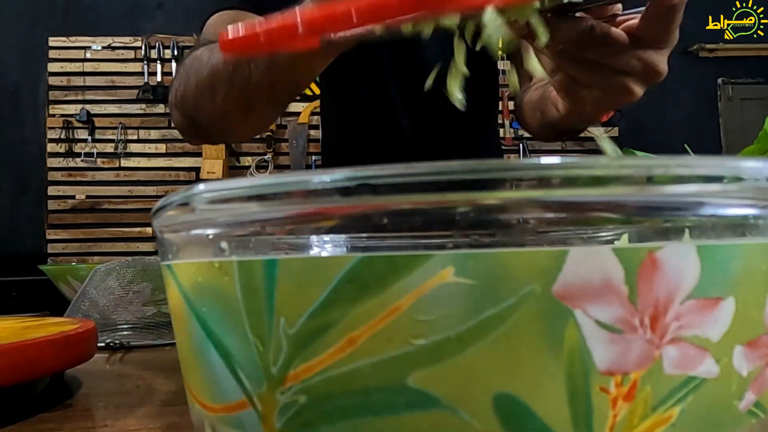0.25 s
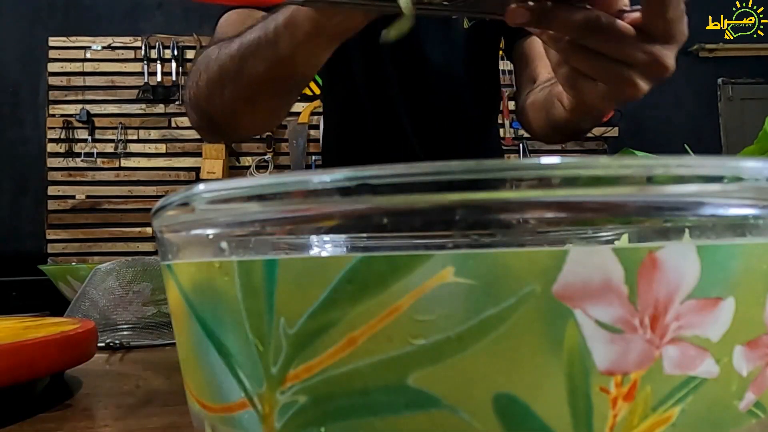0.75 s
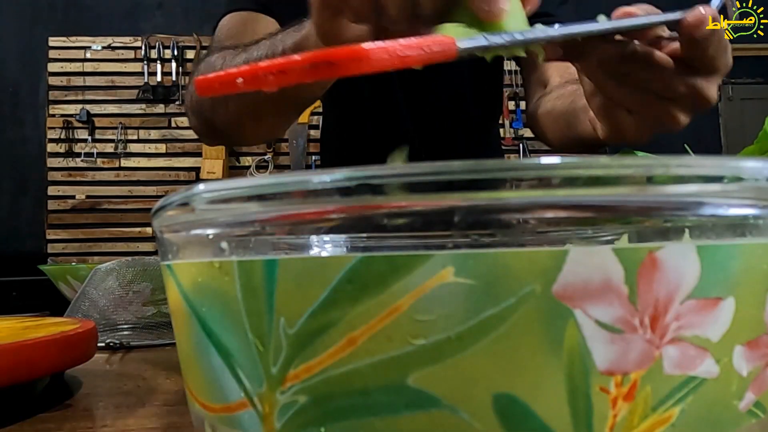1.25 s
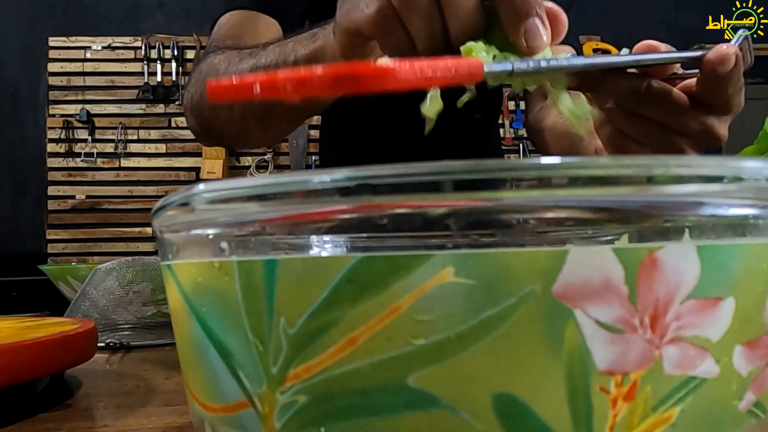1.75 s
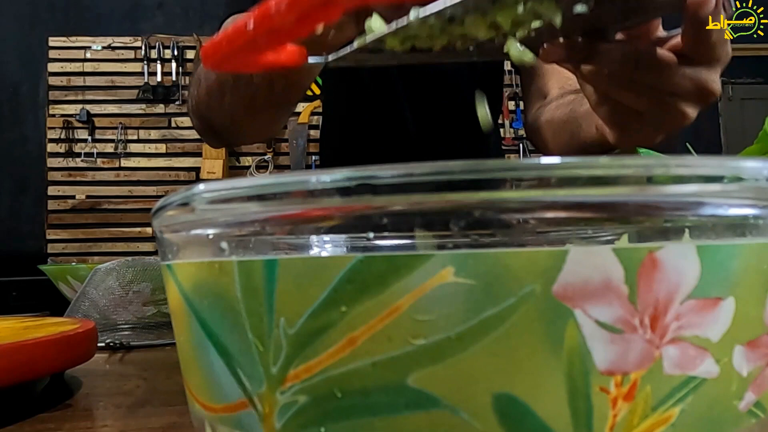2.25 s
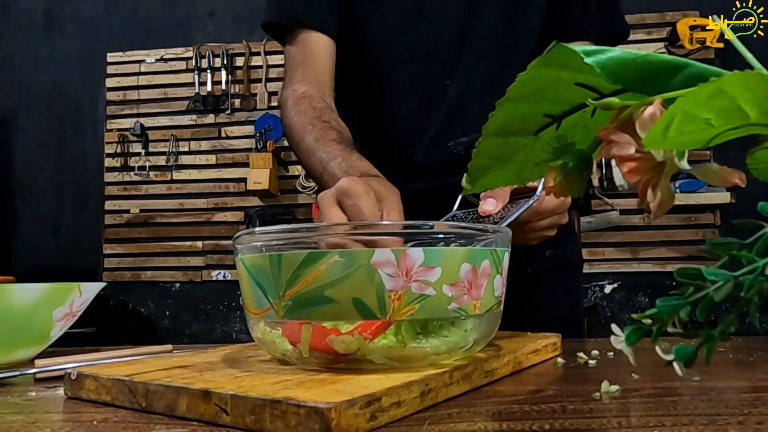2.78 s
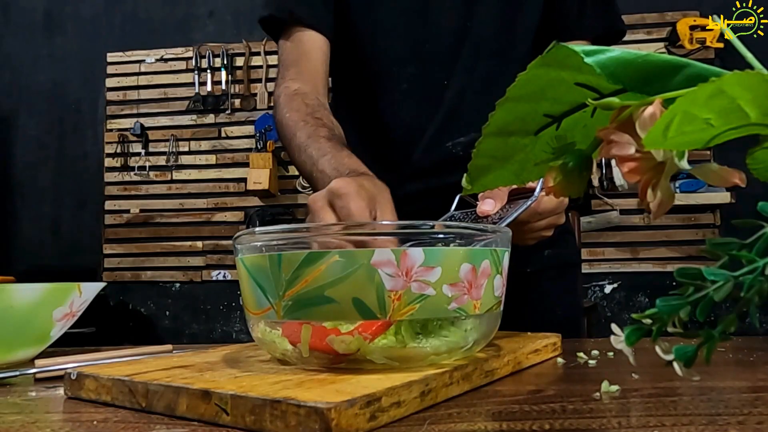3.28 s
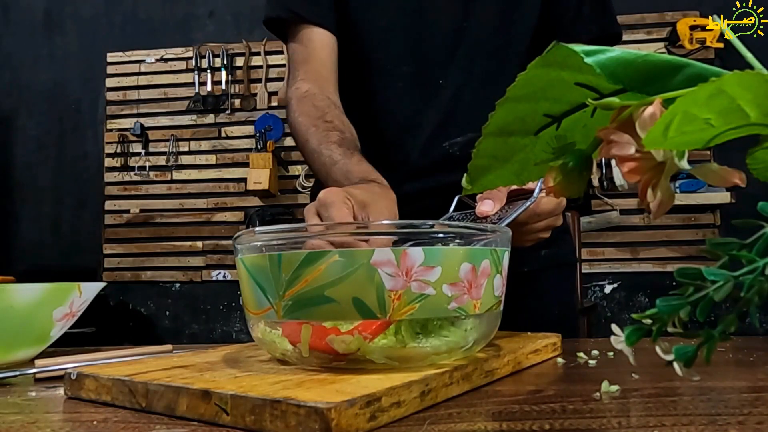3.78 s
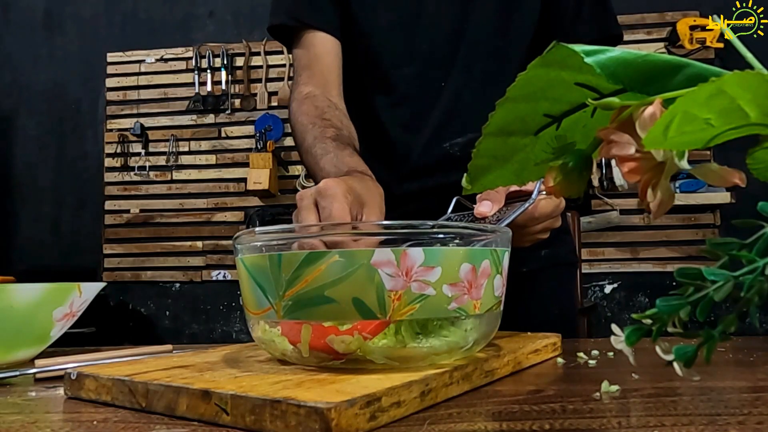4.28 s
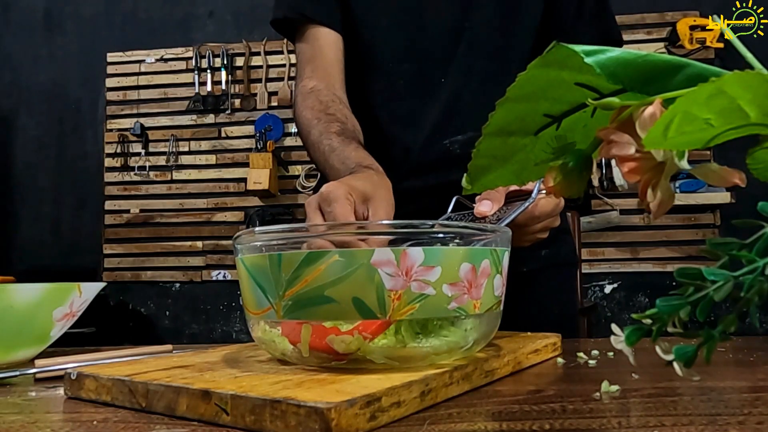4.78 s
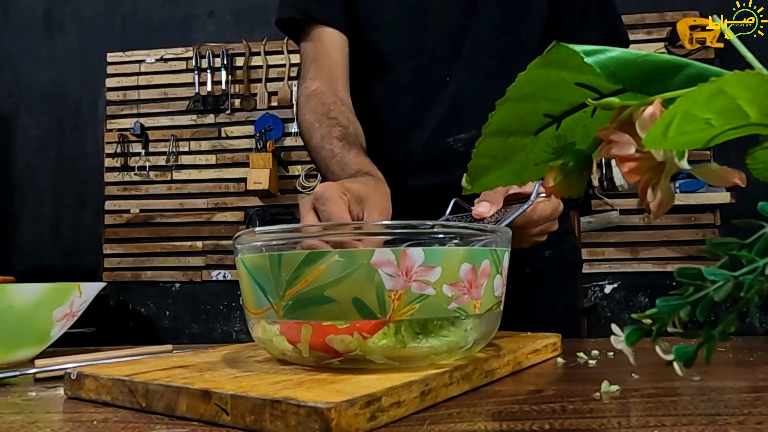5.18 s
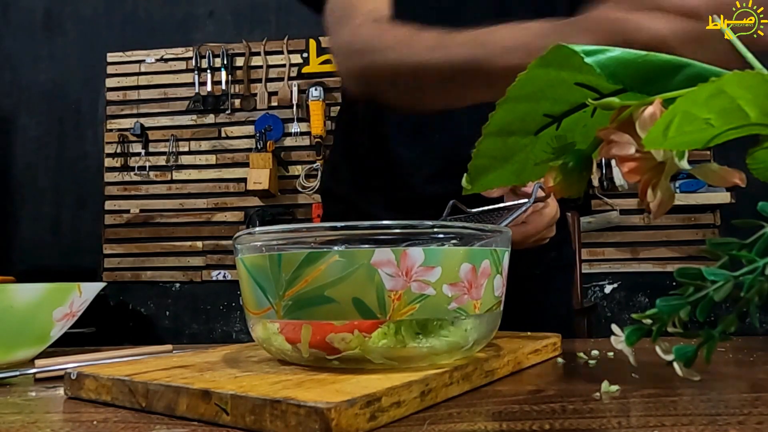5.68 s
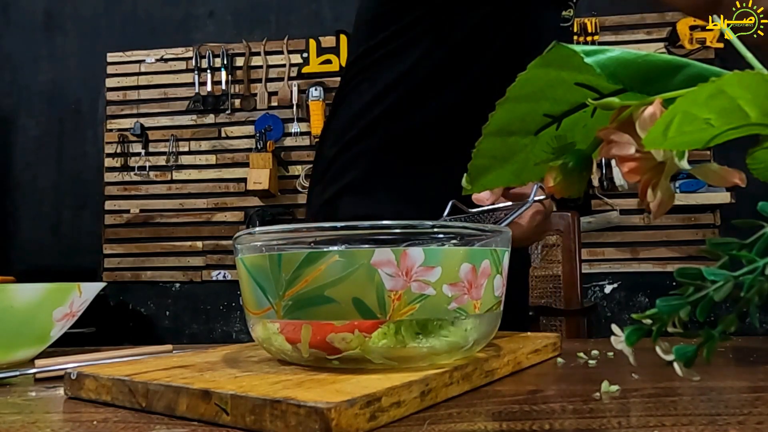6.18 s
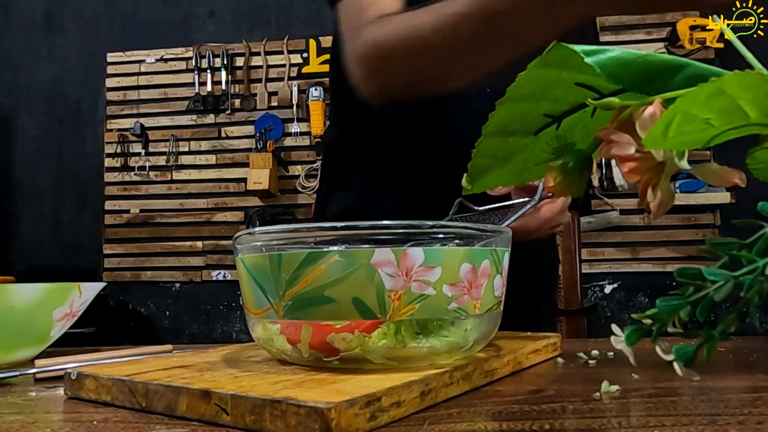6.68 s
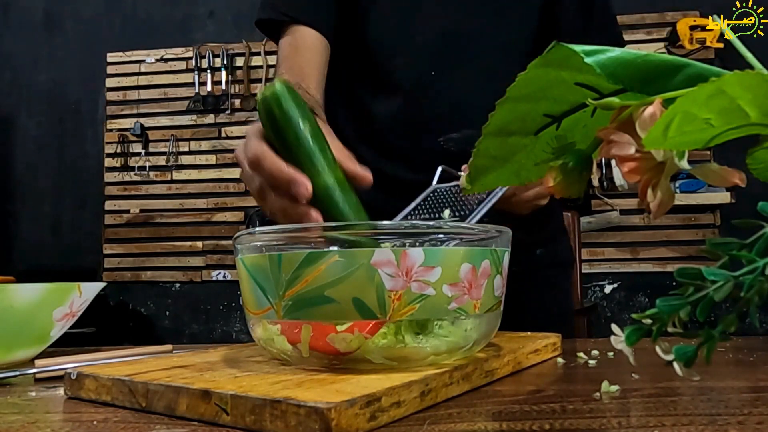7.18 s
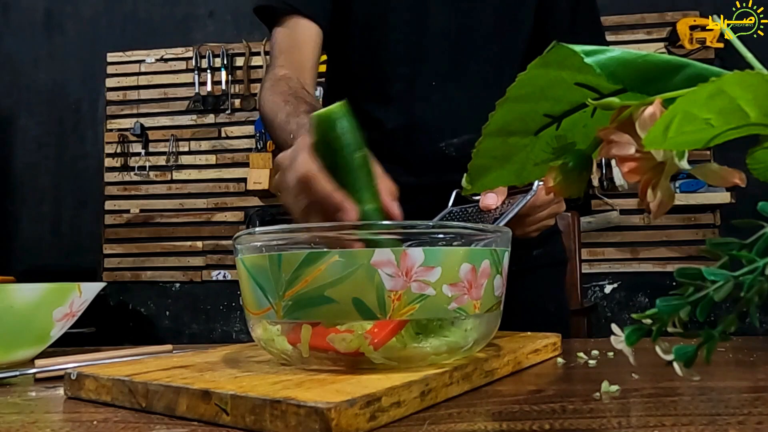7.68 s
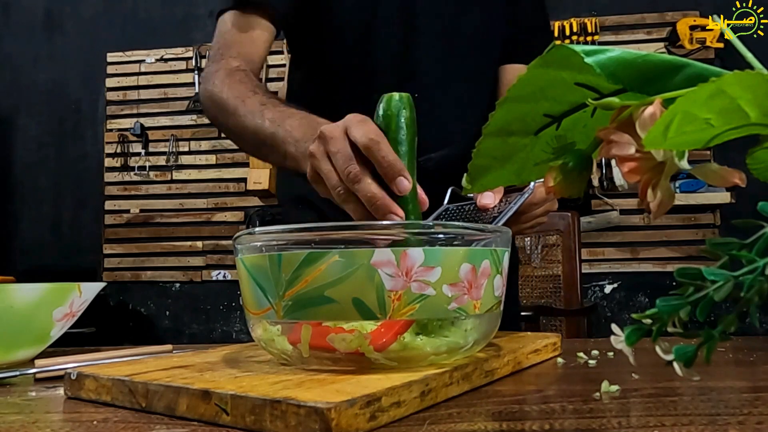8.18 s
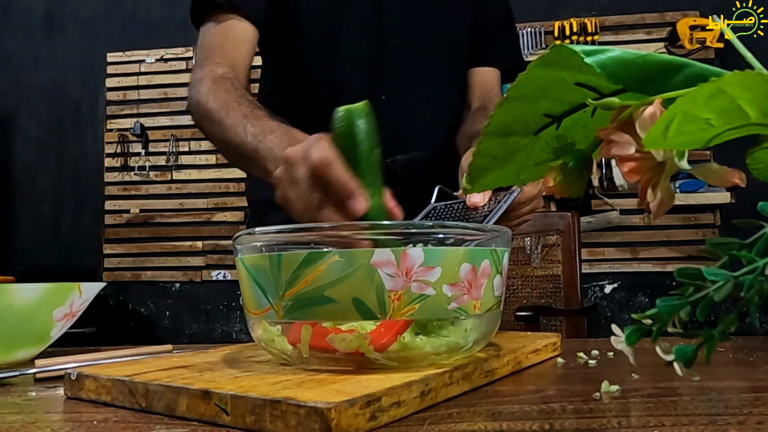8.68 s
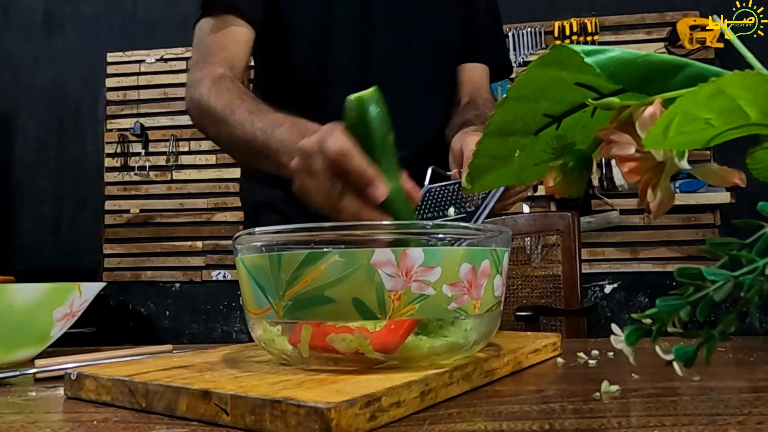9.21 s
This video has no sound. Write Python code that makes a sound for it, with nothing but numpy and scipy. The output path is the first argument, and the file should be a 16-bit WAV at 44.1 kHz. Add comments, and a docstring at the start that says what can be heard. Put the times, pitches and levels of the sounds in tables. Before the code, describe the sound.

Wet vegetable rasps in quick separate strokes on a steel grater over a glass bowl, softens, pauses with a wooden knock, then firm grating resumes.

```python
"""Hard crunches, then quick juicy strokes: cucumber is grated on steel over a glass bowl, in an echoing room.
The strokes soften as the piece wears down; something knocks on the wooden table as a whole cucumber is
fetched, the grater clinks on the bowl and firm strokes begin. Rasps are coloured random tears with damped
steel ringing, squelches are brief sines, clinks and knocks are decaying modes; filtered noise and low sines
make the table's rumble, and a faint swelling hiss, a low hum and still air lie behind."""
import sys
import numpy as np
from scipy import signal
from scipy.fft import rfft, irfft, next_fast_len
from scipy.io import wavfile
from scipy.ndimage import uniform_filter1d

SR = 44100
rng = np.random.default_rng(int(sys.argv[2]) if len(sys.argv) > 2 else 0)


def digitize_waveform(pressure):
    """Quantize a signal to 16-bit integers and store it at the path in sys.argv[1].

    Rows of a 2-D input are taken as channels; values are limited to [-1, 1].
    """
    field = np.atleast_2d(pressure).T
    bounded = np.clip(field, -1, 1)
    quanta = np.round(bounded * 32767).astype(np.int16)
    wavfile.write(sys.argv[1], SR, quanta)


N = 416744
TIME = np.arange(N) / SR

# Modes of the steel grater. Each row: frequency in Hz, relative level in dB, free ring (t60) in s.
GRATER_MODES = [(625, -9, 0.46), (1203, -6, 0.14), (1427, -9, 0.36), (1662, -2, 0.21), (2748, -8, 0.35),
                (3120, -10.5, 0.061), (4160, -5.5, 0.14), (4280, -18, 0.23), (4500, -18, 0.097),
                (5640, -16.5, .18), (8050, -13.5, 0.029)]


def from_db(db):
    """Decibels to gain."""
    return np.exp(np.asarray(db) * (np.log(10) / 20))


def rms_one(x):
    """Scale to unit power."""
    return x / np.sqrt(np.mean(x ** 2) + 1e-20)


def at_hz(points, hz):
    """Read a table on a log-frequency axis."""
    f, value = np.transpose(points)
    return np.interp(np.log(np.maximum(hz, 1)), np.log(f), value)


def in_time(rows):
    """Each column of a curve at every sample."""
    s, *columns = np.transpose(rows)
    return [np.interp(TIME, s, column) for column in columns]


def colour(x, spectrum):
    """Give a noisy signal a spectrum; rms 1."""
    size = next_fast_len(N + SR // 10, real=True)
    hz = np.fft.rfftfreq(size, 1 / SR)
    gain = from_db(at_hz(spectrum, hz)).astype(np.float32)
    coloured = irfft(rfft(x.astype(np.float32), size) * gain, size)
    return rms_one(coloured[..., :N])


def low_pass(x, hz, order=2):
    """Dull a signal above hz."""
    return signal.sosfilt(signal.butter(order, min(hz, SR / 2 - 1), fs=SR, output="sos"), x)


def low_pass_in_phase(x, hz):
    """Dull forwards and then backwards, so that the lows stay in step with the source."""
    return low_pass(low_pass(x, hz)[::-1], hz)[::-1]


def drift(rate):
    """Smooth chance with a spread of about 1, turning about rate times a second."""
    knots = np.cumsum(rng.exponential(1 / rate, N // 20))
    return np.interp(TIME, knots, rng.standard_normal(len(knots)))


def diffuse_noise(size):
    """Two channels of white noise from all around, whose likeness depends on frequency."""
    # Left-right likeness of diffuse sound. Each row: frequency in Hz, correlation from -1 to 1.
    likeness = [(25, 0.95), (60, 1), (130, 1), (400, 0.9), (1200, 0.62), (3000, 0.38), (7000, 0.9),
                (12000, .1)]
    mid, side = rfft(rng.standard_normal((2, size)))
    alike = np.clip(at_hz(likeness, np.fft.rfftfreq(size, 1 / SR)), -1, 1)
    common = np.sqrt((1 + alike) / 2) * mid
    opposed = np.sqrt((1 - alike) / 2) * side * [[1], [-1]]
    return irfft(common + opposed, size)


def ring(modes, extra_db=0, length=1):
    """Decaying sines of a struck body, neighbours opposite in sign; length scales every decay time."""
    hz, db, t60 = np.transpose(modes)[:, :, None].astype(np.float32)
    t = TIME[:SR // 2].astype(np.float32)
    signs = (-1) ** np.arange(len(hz))[:, None]
    decay = np.exp(-np.minimum(t * np.float32(np.log(1000) / length) / t60, 20))
    strengths = np.ravel(signs * from_db(db + extra_db))
    return strengths @ (decay * np.sin(np.float32(2 * np.pi) * hz * t))


def add(track, s, sound):
    """Mix a sound in at a time."""
    start = round(s * SR)
    track[start:start + len(sound)] += sound[:N - start]


def stroking(strokes, attack_s, bite_db, swell_db, release_s, drag_db, drag_s, drag_crunch_db):
    """A push slides in, bites, holds, lets go and drags on: tearing level, and extra crunch in the lows."""
    motion = np.zeros((2, N))
    for s, hold, level_db, crunch_db in strokes:
        near = slice(max(0, int(s * SR) - SR // 8), int(s * SR) + 3 * SR // 4)
        t = TIME[near] - s
        before, held, after = np.minimum(t, 0), np.clip(t / hold, 0, 1), np.maximum(t - hold, 0)
        grip = np.exp(before / attack_s - after / release_s)
        # the level steps by bite_db at the bite and moves by swell_db over the hold
        push = grip * from_db(level_db - bite_db * (t < 0) + swell_db * (held - .5))
        drag = from_db(level_db + drag_db) * (after > 0) * (1 - grip) * np.exp(-(after / drag_s) ** 2)
        crunch = push * (from_db(crunch_db) - 1) + drag * (from_db(drag_crunch_db) - 1)
        motion[:, near] += [push + drag, crunch]
    return motion


def snagging(snap_s=.005):
    """A tooth snags in the juicy flesh and snaps free: one brief surge of tearing and crunch."""
    # Each row: time of the peak in seconds, level before the mix in dB, extra crunch in the lows in dB.
    snags = [(.298, -39.5, -10), (.462, -60, 19.5), (1.222, -46, 7), (1.479, -37, 6.5), (1.715, -44, -0.5),
             (1.822, -47, 17.5), (1.941, -44, 5), (1.975, -40, -8), (2.078, -36, -3.5)]
    motion = np.zeros((2, N))
    for s, level_db, crunch_db in snags:
        near = np.abs(TIME - s) < 10 * snap_s
        surge = from_db(level_db) * np.exp(-.5 * ((TIME[near] - s) / snap_s) ** 2)
        motion[:, near] += [surge, surge * (from_db(crunch_db) - 1)]
    return motion


def shifting(x, patchy_db, full_hz=2000):
    """The contact keeps changing, so brief resonances come and go at random pitches, least in the lows."""
    hz, _, frames = signal.stft(x.astype(np.float32), SR, nperseg=256)
    patches = uniform_filter1d(rng.standard_normal(frames.shape), size=9, axis=1)
    patches = uniform_filter1d(patches, size=4, axis=0)
    depth_db = patchy_db * np.sqrt(np.minimum(hz / full_hz, 1))[:, None]
    _, shifted = signal.istft(frames * from_db(depth_db * rms_one(patches)))
    return rms_one(shifted[:N])


def rasp(motion, spectrum, tears_per_s, size_db, catch_db, patchy_db, steel_db, crunch_hz):
    """The teeth tear cell after cell; the flesh catches and slips, so tears come in stronger and weaker clumps."""
    speed, crunch = motion
    sizes = from_db(size_db * np.minimum(rng.exponential(1, N), 4)) * rng.choice([-1, 1], N)
    torn = rng.random(N) < tears_per_s / SR
    tears = sizes * torn * from_db(catch_db * drift(260))
    grain = shifting(colour(tears, spectrum), patchy_db)
    sound = speed * grain + crunch * low_pass_in_phase(grain, crunch_hz)
    # the tears also set the hand-damped steel ringing
    steel = ring(GRATER_MODES, length=0.59)
    ringing = signal.oaconvolve(speed * rms_one(tears), steel / np.linalg.norm(steel))[:N]
    return sound + from_db(steel_db) * ringing


def squelch(motion, cycles=22, spread_octaves=0.24):
    """Juice pockets pop under the strokes, each at its own pitch, falling 60 dB in a set count of cycles."""
    # Wet pockets in the pulp. Each row: typical pitch in Hz, level relative to the stroke in dB,
    # pops per second of stroke.
    pockets = [(536, -9, 110), (4000, -23, 300)]
    speed, out, t = motion[0], np.zeros(N), TIME[:SR // 20]
    for centre_hz, level_db, per_s in pockets:
        born = np.flatnonzero((rng.random(N) < per_s / SR) & (speed > speed.max() / 20))
        for i, (detune, size_db) in zip(born, rng.standard_normal((SR // 20, 2))):
            hz = centre_hz * 2 ** (spread_octaves * detune)
            decay = from_db(level_db + size_db - 60 * t * hz / cycles)
            add(out, TIME[i], speed[i] * decay * np.sin(2 * np.pi * hz * t))
    return out


def hard_crunches():
    """The first abrupt pushes over the teeth: their motion and their rasp."""
    # Each row: bite in seconds, hold in seconds, level before the mix in dB, extra crunch in the lows in dB.
    strokes = [(.026, 0.002, -31.5, 0), (.041, 0.0024, -33, 0), (.058, 0.012, -34, 0.49)]
    # Colour of the rasp. Each row: frequency in Hz, relative density in dB per Hz.
    spectrum = [(120, -60), (200, -11.5), (309, 3.5), (512, -9.5), (647, -5), (789, -13.5), (1070, 1.5),
                (1430, -14), (2210, -7), (2510, -20), (4090, -14.5), (12100, -29.5), (15000, -45)]
    motion = stroking(strokes, attack_s=0.012, bite_db=2.5, swell_db=4.5, release_s=0.0036,
                      drag_db=-15, drag_s=0.026, drag_crunch_db=-33.0)
    return motion, rasp(motion, spectrum, tears_per_s=5000, size_db=2.5, catch_db=1.0, patchy_db=4.0,
                        steel_db=-31, crunch_hz=1500)


def juicy_strokes():
    """Quick wet pushes, about four a second, with snags and popping juice."""
    # Each row: bite in seconds, hold in seconds, level before the mix in dB, extra crunch in the lows in dB.
    strokes = [(.088, 0.054, -43.5, 9.5), (.283, 0.026, -34.5, -0.5), (.577, 0.046, -37, 4),
               (.824, .055, -38.5, 4.5), (1.05, 0.051, -40.5, 4.5), (1.317, 0.045, -40, 3.5),
               (1.56, 0.032, -40.5, 9), (1.79, .042, -36, 2), (2.026, 0.046, -37.5, 2),
               (2.29, 0.0099, -42, 6.5)]
    # Colour of the rasp. Each row: frequency in Hz, relative density in dB per Hz.
    spectrum = [(140, 0), (230, -10), (377, -2), (482, -11), (673, -7.5), (925, -20), (1410, -11.5),
                (2390, -15), (4130, -4.5), (4840, -11), (6650, -9), (9450, -13.5), (11100, -25.5),
                (12100, -20.5), (15500, -42)]
    motion = snagging() + stroking(strokes, attack_s=.016, bite_db=6.5, swell_db=2.5, release_s=.015,
                                   drag_db=-22, drag_s=.17, drag_crunch_db=14.5)
    grating = rasp(motion, spectrum, tears_per_s=5000, size_db=2.5, catch_db=4.0, patchy_db=3.5,
                   steel_db=-30.0, crunch_hz=1490)
    return motion, grating + squelch(motion)


def soft_strokes():
    """Light pushes of a worn-down piece, with sparser tears."""
    # Each row: bite in seconds, hold in seconds, level before the mix in dB, extra crunch in the lows in dB.
    strokes = [(2.59, 0.1, -55, -3), (2.772, 0.061, -44.5, -1), (3.028, 0.067, -52, 0),
               (3.285, 0.054, -48, 1), (3.41, 0.027, -49.5, -10), (3.527, 0.052, -46.5, -3.5),
               (3.668, 0.017, -53, -13), (3.778, 0.15, -61, -4), (4.5, 0.038, -50, 0),
               (4.774, 0.062, -54, 0.5), (4.97, 0.053, -62.5, 1.5), (5.1, 0.053, -47, -1.5)]
    # Colour of the rasp. Each row: frequency in Hz, relative density in dB per Hz.
    spectrum = [(110, -20), (190, -10.5), (265, 1), (362, -18), (553, -22.5), (799, -23.5), (926, -30),
                (1130, -18), (1240, -28.5), (1440, -21.5), (2280, -31.5), (7140, -37.5), (12400, -50.5),
                (15500, -58)]
    motion = stroking(strokes, attack_s=0.017, bite_db=4.0, swell_db=-1.0, release_s=0.026,
                      drag_db=-11.5, drag_s=.17, drag_crunch_db=-2)
    return motion, rasp(motion, spectrum, tears_per_s=2500, size_db=1.0, catch_db=1.5, patchy_db=3.5,
                        steel_db=-21, crunch_hz=1500)


def firm_strokes():
    """Firm pushes of the fresh cucumber, with dense tears and a marked bite."""
    # Each row: bite in seconds, hold in seconds, level before the mix in dB, extra crunch in the lows in dB.
    strokes = [(7.558, 0.044, -53.5, -2), (7.675, 0.15, -59, -2.5), (7.81, 0.1, -44, 3.5),
               (8.03, 0.026, -46.5, 5.5), (8.23, .05, -36.5, 3), (8.446, 0.022, -41.5, 3.5),
               (8.652, 0.046, -35, 0.5), (8.868, 0.049, -35.5, 1.5), (9.096, 0.031, -34, -1),
               (9.195, 0.036, -48, 3), (9.308, 0.034, -34, -1)]
    # Colour of the rasp. Each row: frequency in Hz, relative density in dB per Hz.
    spectrum = [(110, -19), (180, -3), (271, -2), (359, -8.5), (521, -13.5), (627, -10.5), (830, -18.5),
                (1200, -11.5), (1420, -15.5), (2190, -20.5), (3300, -23.5), (5350, -26.5), (7350, -23),
                (11900, -36), (15500, -51)]
    motion = stroking(strokes, attack_s=0.014, bite_db=8.5, swell_db=-0.5, release_s=0.012,
                      drag_db=-15.5, drag_s=0.25, drag_crunch_db=3.5)
    return motion, rasp(motion, spectrum, tears_per_s=5000, size_db=2.0, catch_db=3.0, patchy_db=3.5,
                        steel_db=-24.0, crunch_hz=2500)


def clinks(uneven_db=5.0, contact_db=-13.0, contact_length=0.059, ring_db=-16.0):
    """Steel meets glass: both ring, most near the contact's pitch, with a brief bite while they still touch."""
    # Grater against bowl. Each row: time in seconds, relative grater level in dB, relative bowl level in dB,
    # pitch that the contact favours in Hz, fall away from it in dB per octave, share of the free ring length.
    hits = [(6.5167, -7.5, -15, 1720, 3.5, 0.25), (6.525, -52, -13.5, 2900, 2, 0.36),
            (6.769, -62, -41, 4500, 4, 0.3), (7.019, -42, -41, 2400, 6, 0.98),
            (7.146, -29.5, -60, 623, 18.5, 0.56), (7.76, -16.5, -22, 1790, 4, 0.44),
            (7.821, -37, -33, 1390, 4, 0.45), (7.9112, -14.5, -16, 2650, 2.5, 0.29),
            (8.0114, -26.5, -26, 1700, 8, 0.5), (8.0504, -24, -44, 2700, 6, 0.36),
            (8.0792, -25, -31, 2820, 6, 0.4), (8.1097, -14.5, -25, 2610, 1.5, 0.34),
            (8.2276, -8.5, -15, 2700, 1.5, 0.49), (8.268, -11, -34, 2140, 1, 0.51)]
    # Modes of the glass bowl. Each row: frequency in Hz, relative level in dB, free ring (t60) in s.
    bowl_modes = [(1005, -3.5, 0.1), (1240, -7.5, 0.14), (1320, -18.5, 0.2), (1383, 5, 0.17),
                  (1727, -2, 0.12), (1870, -15, 0.28), (2740, -30, 0.49), (2900, -6.5, 0.082),
                  (3080, -5.5, 0.064), (3800, -4.5, 0.091), (3870, -20.5, 0.29), (4150, -17.5, 0.4),
                  (5250, -27.5, 0.2), (5120, -24, 0.38), (7110, -21, 0.48), (7570, -16, 0.12),
                  (10030, -20.5, 0.11), (12190, -30, 0.18)]
    out = np.zeros(N)
    for s, grater_db, bowl_db, hz, focus_db, length in hits:
        for modes, level_db in ((GRATER_MODES, grater_db), (bowl_modes, bowl_db)):
            octaves_off = np.abs(np.log2(np.array(modes)[:, :1] / hz))
            uneven = uneven_db * rng.standard_normal(octaves_off.shape)
            strength = level_db - focus_db * octaves_off + uneven
            bite = ring(modes, strength + contact_db, contact_length)
            add(out, s, ring(modes, strength + ring_db, length) + bite)
    return out


def knocks():
    """Short wooden knocks on the table; a softer contact is duller."""
    # Each row: time in seconds, relative level in dB, brightness (cutoff) in Hz, multiple of the modes' ring.
    hits = [(3.92, -39.5, 333, 1.25), (6.2461, -28, 700, 2.5), (6.2964, -17.5, 3980, 1.13),
            (7.148, -41.5, 594, 3), (7.337, -47, 400, 1.5), (7.369, -38.5, 328, 3.2),
            (7.41, -43.5, 298, 2.3), (8.15, -27.5, 460, 3.6)]
    # Modes of the wood. Each row: frequency in Hz, relative level in dB, basic ring (t60) in s.
    wood_modes = [(295, -13, 0.018), (470, -15.5, 0.02), (694, -12.5, 0.0099), (983, -14.5, 0.021),
                  (1450, -3.5, 0.002), (2400, -3, 0.0008), (4740, -7.5, 0.0006)]
    out = np.zeros(N)
    for s, level_db, hz, length in hits:
        knock = low_pass(ring(wood_modes, length=length), hz, order=3)
        add(out, s, from_db(level_db) * 10 * knock / np.linalg.norm(knock))
    return out


def swelling_hiss():
    """Faint airy hiss that swells and fades: coloured noise under stroke envelopes."""
    # Each row: end of the rise in seconds, hold in seconds, level in dB, change of the lows in dB.
    swells = [(5.35, 0.4, -84, 5), (5.7, 0.32, -79, -16), (5.79, 0.014, -99, 25), (6.15, 0.16, -64.5, -1),
              (6.8, 0.28, -75.5, 0), (7.3, 0.38, -80.5, -14.5)]
    # Colour of the hiss. Each row: frequency in Hz, relative density in dB per Hz.
    spectrum = [(150, -28), (500, -0.5), (1500, 4), (3500, -5), (6500, -1), (9000, -9), (12500, -20.5),
                (15500, -12.5)]
    level, low_part = stroking(swells, attack_s=0.031, bite_db=-2, swell_db=4.5, release_s=0.038,
                               drag_db=-12, drag_s=.2, drag_crunch_db=2.0)
    hiss = colour(rng.standard_normal(N), spectrum)
    return level * hiss + low_part * low_pass_in_phase(hiss, 2500)


def table_thumps(thump_s=0.036, press_s=0.0012):
    """The hands bear down on the table: low sines with a quick rise and a short decay."""
    # Each row: time in seconds, level in dB, pitch in Hz.
    leans = [(0.049, -28.5, 44.6), (2.879, -25, 66), (3.172, -26, 63), (3.629, -26.5, 100),
             (3.924, -19, 74.6), (6.25, -20, 55.5), (6.321, -27, 150), (6.528, -23, 43),
             (7.341, -15.5, 48.4), (7.368, -20.5, 92.3), (8.014, -21.5, 75), (8.153, -12, 105.8),
             (8.248, -18, 104.6), (8.661, -22, 95), (9.199, -18, 97)]
    thumps, t = np.zeros(N), TIME[:SR // 2]
    envelope = np.exp(-t / thump_s) * (1 - np.exp(-t / press_s))
    for s, level_db, hz in leans:
        add(thumps, s, from_db(level_db) * np.sin(2 * np.pi * hz * t) * envelope)
    return thumps


def table_rumble(shake, sway_db=-2, drum_rest_db=-60, drum_with_sway_db=-5, shake_s=0.032):
    """The table sways; its top drums faintly all the time, more with the sway and for a moment at each push."""
    # Course of the slow sway. Each row: time in seconds, base level in dB that sway and drumming both follow.
    sway_level = [(0.0, -35.5), (0.53, -50.5), (2.34, -44.5), (2.92, -40), (3.55, -42.5), (3.58, -39),
                  (4.45, -48), (5.0, -39.5), (6.05, -50), (6.1, -43), (6.24, -31), (7.19, -53), (7.37, -32),
                  (7.47, -34.5), (8.74, -27), (8.79, -24.5), (9.13, -27.5), (9.45, -29.5)]
    # Colours of the sway and of the drumming. Each row: frequency in Hz, relative density in dB per Hz.
    sway_spectrum = [(12, -12), (22, -8), (36, -2), (50, -6), (65, -9.5), (85, -26), (150, -48.5),
                     (1000, -140)]
    drum_spectrum = [(50, -17.5), (80, 3.5), (96, -4.5), (106, 5), (120, -12), (150, -8), (200, -20),
                     (262, -26.5), (330, -23.5), (500, -40), (1000, -70.5), (4000, -140)]
    base_db, = in_time(sway_level)
    shaken = low_pass(shake, 1 / (2 * np.pi * shake_s), order=1)
    drum_level = np.sqrt(from_db(drum_rest_db) ** 2 + from_db(base_db + drum_with_sway_db) ** 2 + shaken ** 2)
    size = next_fast_len(N)
    sway = from_db(base_db + sway_db) * colour(diffuse_noise(size), sway_spectrum)
    return sway + drum_level * colour(diffuse_noise(size), drum_spectrum)


def hum(waver_db=1.5):
    """One low tone that swells for a moment, its level wavering slightly."""
    # Each row: time in seconds, pitch in Hz, rms level before the waver in dB.
    course = [(.4, 59.9, -57), (.7, 59.07, -46), (1.5, 58.23, -48.5), (1.85, 58.56, -36.5),
              (2.45, 60.2, -34.5), (2.55, 59.1, -37.5), (2.62, 55.5, -86)]
    hz, level_db = in_time(course)
    level = np.sqrt(2) * from_db(level_db + waver_db * drift(15))
    return level * np.sin(2 * np.pi * np.cumsum(hz) / SR)


def still_air(level_db=-50.5):
    """Steady diffuse noise of the quiet room."""
    # Each row: frequency in Hz, relative density in dB per Hz.
    spectrum = [(71, -34), (120, 10), (212, -2), (276, -25.5), (529, -32), (955, -37), (1270, -30.5),
                (2150, -41.5), (2530, -46), (3730, -49.5), (7440, -45.5), (10000, -59.5), (15500, -71.5)]
    return from_db(level_db) * colour(diffuse_noise(next_fast_len(N)), spectrum)


def room_response(build_s=0.0046):
    """A diffuse tail of unit energy in which each band dies at its own pace."""
    # Each row: band centre in Hz, reverberation time (t60) in s.
    bands = [(150, 1), (500, 0.71), (1400, 0.68), (4000, 0.84), (9000, 0.49), (15000, 0.97)]
    t, noise = TIME[:SR], rfft(diffuse_noise(SR))
    hz, centres = np.fft.rfftfreq(SR, 1 / SR), np.transpose(bands)[0]
    tail = 0
    for centre, t60 in bands:
        # each band fades linearly into its neighbours on the log-frequency axis
        share = at_hz(np.c_[centres, centres == centre], hz)
        tail = tail + irfft(noise * share, SR) * from_db(-60 * t / t60)
    return rms_one(tail * (1 - np.exp(-t / build_s))) / np.sqrt(SR)


def microphones(x, lag_samples=.6, scatter_db=-5, scatter_hz=11500):
    """Direct sound reaches the right microphone first; nearby things scatter its treble differently to each."""
    size = next_fast_len(N)
    hz = np.fft.rfftfreq(size, 1 / SR)
    turn = np.pi * hz / SR * lag_samples * np.array([[-1], [1]])
    echoes = rng.standard_normal(SR // 120)
    treble = np.minimum(hz / scatter_hz, 1) ** 2
    scatter = from_db(scatter_db) * treble * rfft(echoes / np.linalg.norm(echoes), size)
    return irfft(rfft(x, size) * (np.exp(1j * turn) + scatter * [[1], [-1]]), size)[:, :N]


def scene():
    """Grating, clinks and knocks, each with its share of the room, over hiss, rumble, hum and still air."""
    hard_push, hard = hard_crunches()
    juicy_push, juicy = juicy_strokes()
    soft_push, soft = soft_strokes()
    firm_push, firm = firm_strokes()
    clink, knock = clinks(), knocks()
    grating = hard + from_db(-2.5) * juicy + from_db(3.0) * soft + from_db(-0.5) * firm
    # the rim is struck a little to the right: 2.5 dB between the sides
    panned_clink = clink * from_db(2.5 * np.array([[-.5], [.5]]))
    direct = microphones(grating + knock + swelling_hiss() + panned_clink)

    sent = from_db(-5.5) * hard + from_db(-6.5) * juicy + from_db(-4.5) * soft + from_db(-3.5) * firm
    # the table top radiates the knock's low part all round the room
    sent = sent + from_db(-6.5) * clink + from_db(2.0) * low_pass(knock, 1800, order=1)
    room = signal.fftconvolve(sent[None], room_response(), axes=1)[:, :N]

    # each kind of stroke shakes the table in its own measure
    shake = from_db(-0.5) * hard_push[0] + from_db(-13.5) * juicy_push[0]
    shake = shake + from_db(9) * soft_push[0] + from_db(2.5) * firm_push[0]
    return direct + room + table_thumps() + table_rumble(shake) + hum() + still_air()


def record(dry):
    """Each microphone has its own slight colour; the top is cut steeply."""
    # Each row: frequency in Hz, left minus right in dB.
    balance = [(300, -0.5), (1400, 0.7), (4000, 0.1), (8000, 0.4), (12000, 3)]
    size = next_fast_len(N)
    tilt_db = at_hz(balance, np.fft.rfftfreq(size, 1 / SR)) * np.array([[.5], [-.5]])
    heard = irfft(rfft(dry, size) * from_db(tilt_db), size)[:, :N]
    cutoff_hz = 15400
    return signal.sosfilt(signal.ellip(10, .2, 80, cutoff_hz, fs=SR, output="sos"), heard)


dry = scene()
out = record(dry)
digitize_waveform(out)
```